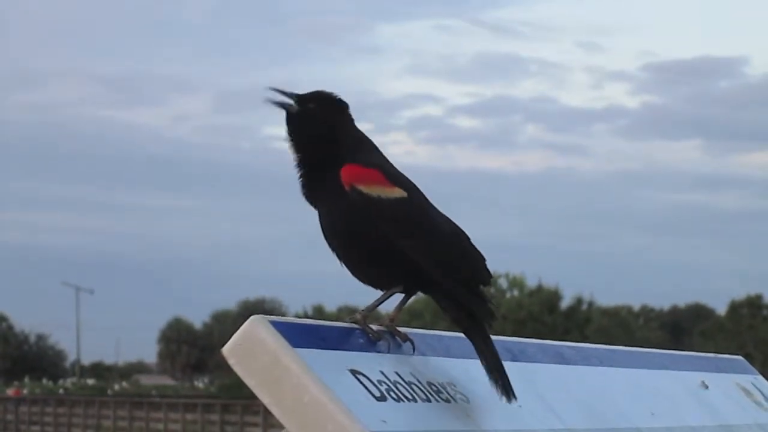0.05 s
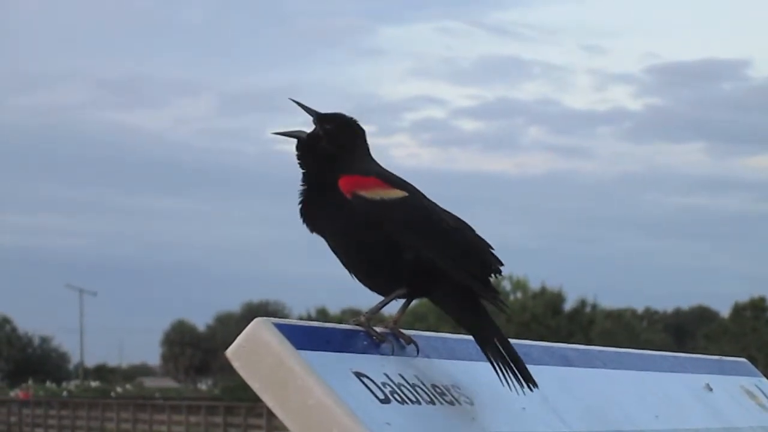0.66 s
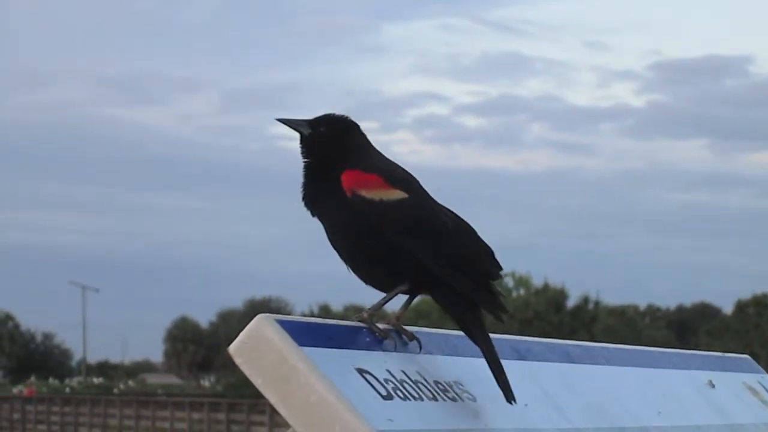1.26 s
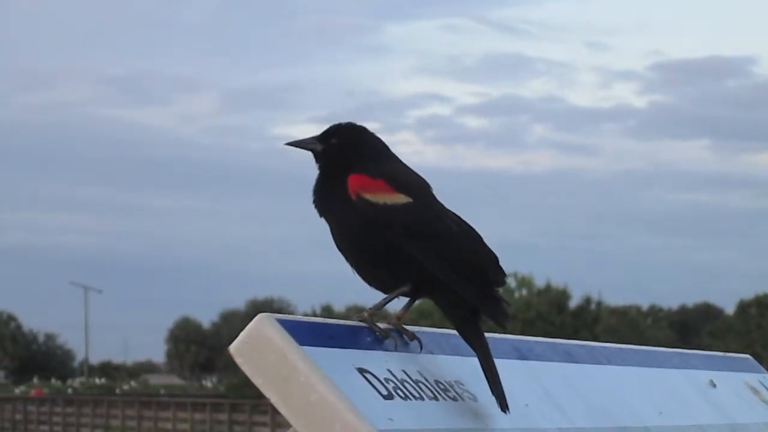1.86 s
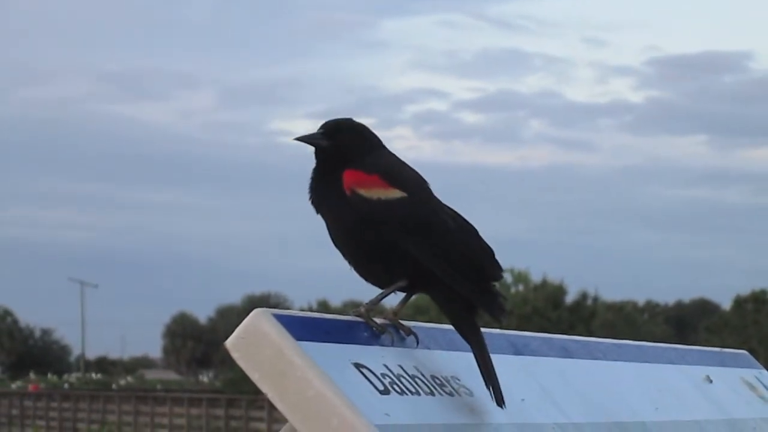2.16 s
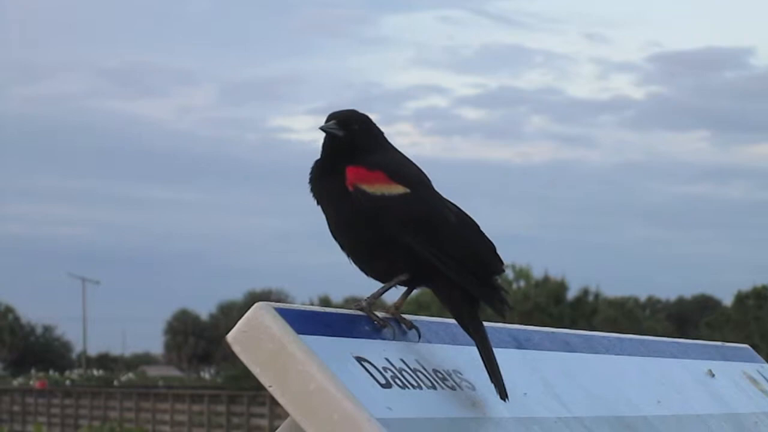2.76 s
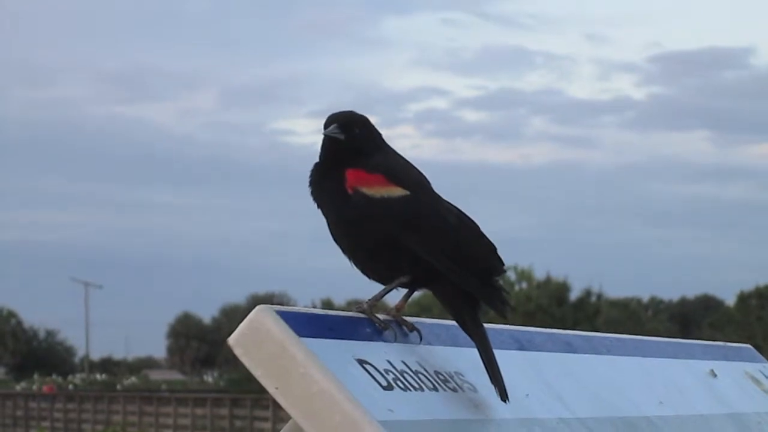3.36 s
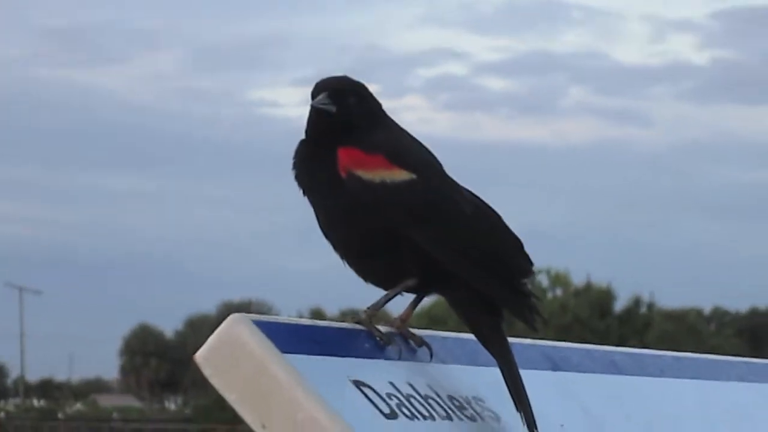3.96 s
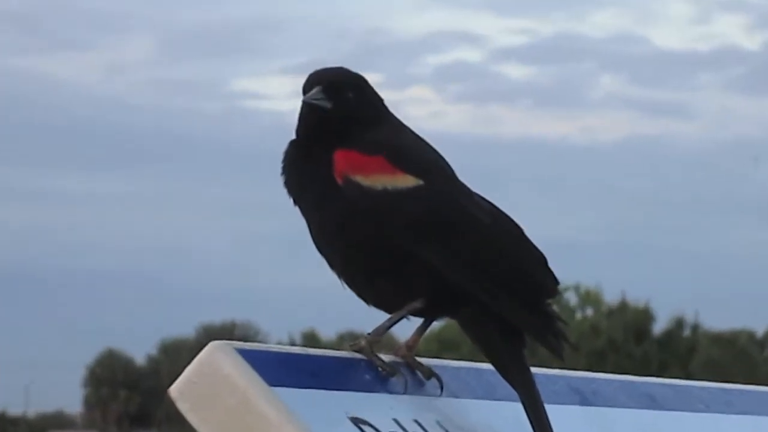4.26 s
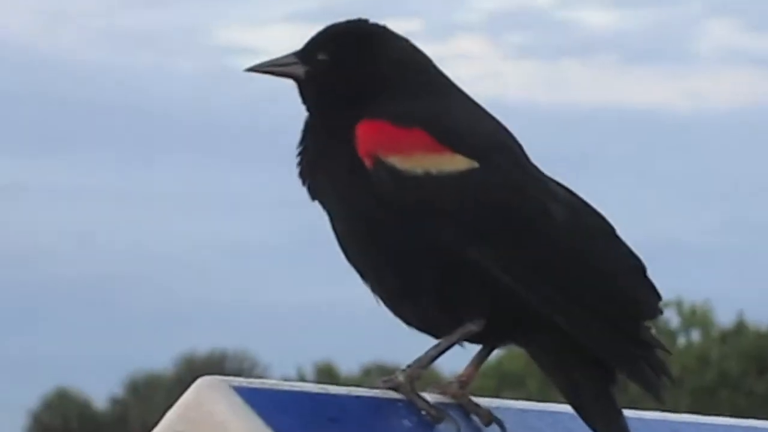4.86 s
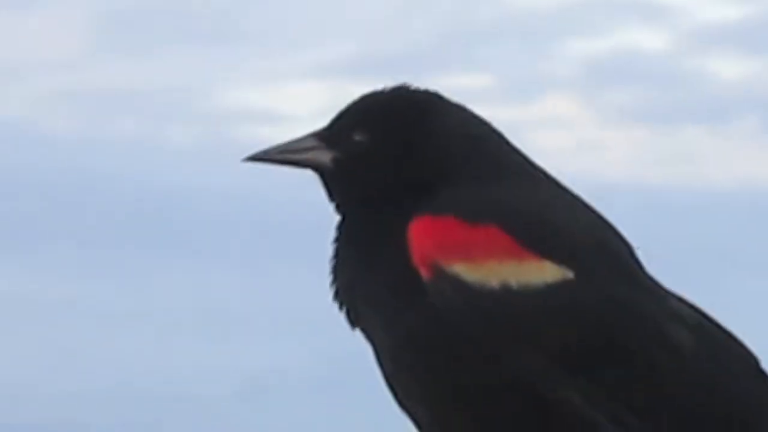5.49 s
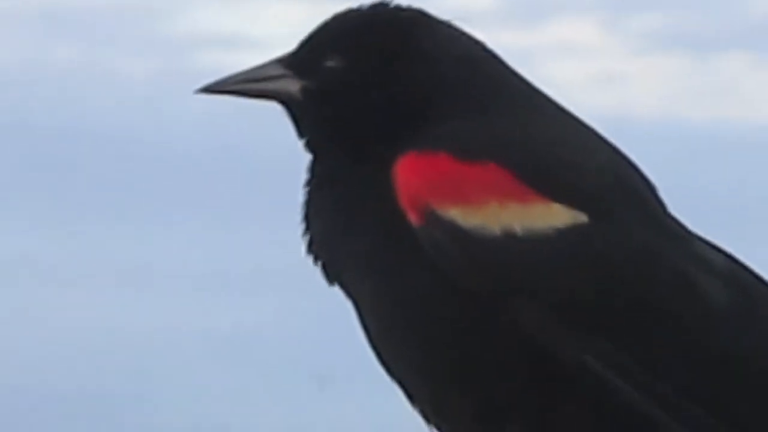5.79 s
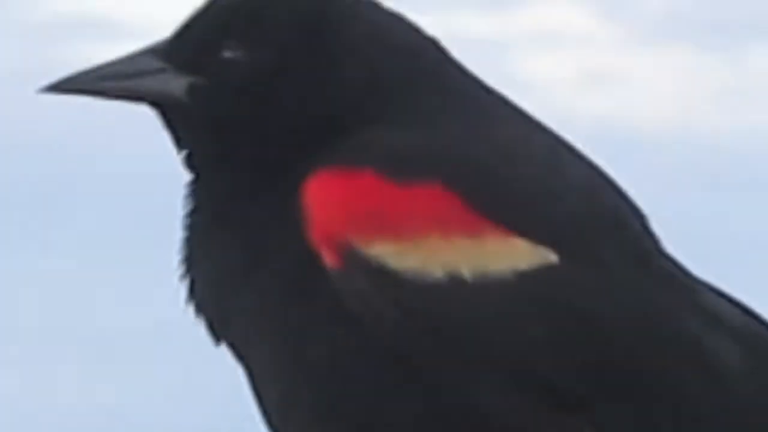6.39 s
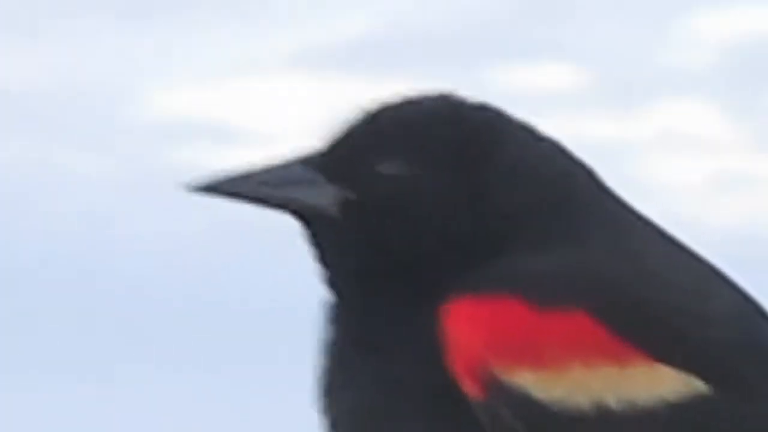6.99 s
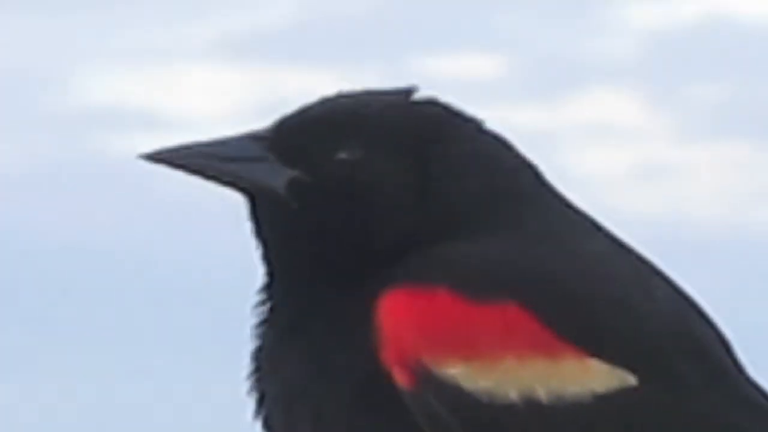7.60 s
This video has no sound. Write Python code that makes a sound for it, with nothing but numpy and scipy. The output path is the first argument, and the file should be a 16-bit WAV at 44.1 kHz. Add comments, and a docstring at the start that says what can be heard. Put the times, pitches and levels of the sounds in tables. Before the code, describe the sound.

A blackbird sings one loud buzzy trill close by, then distant birds give harsh calls over crickets and faint traffic, with one sharp snap.

```python
"""Blackbird in a marsh

A red-winged blackbird sings close by from both sides of its syrinx: gurgled notes, a buzzy trill,
a clear whistle. Farther off, tern-like birds give harsh falling calls over crickets and traffic rumble.
Something snaps twice against the camera; at the loud snap its gain control ducks, then creeps back."""
import sys
import numpy as np
from scipy import signal
from scipy.fft import rfft, irfft, next_fast_len
from scipy.io import wavfile
from scipy.ndimage import uniform_filter1d, map_coordinates

SR = 44100
rng = np.random.default_rng(int(sys.argv[2]) if len(sys.argv) > 2 else 0)


def log_audio(samples):
    """Write samples as a 16-bit WAV file to the path given in sys.argv[1]."""
    # one column per channel
    frames = np.atleast_2d(samples).T
    # limit to full scale, then quantise
    limited = np.clip(frames, -1, 1)
    pcm = np.round(limited * 32767).astype(np.int16)
    wavfile.write(sys.argv[1], SR, pcm)


N = 341334
TIME_S = np.arange(N) / SR

# Gurgled notes. Each row: start and length in seconds, share spent swelling, start and end pitch in Hz,
# level in dB, flutter depth, overtone boost in dB.
GURGLES = [ (0, 0.044, .3, 2664, 2310, -35, 0.25, 5.5), (0.036, 0.065, 0.078, 1167, 1208, -23, 0.15, 12),
           (0.098, 0.024, 0.45, 1344, 840, -31, 0.4, 0), (0.123, 0.015, .3, 1340, 1580, -20.5, 0.2, 0),
           (.128, 0.16, 0.099, 1540, 1633, -33.5, 0.5, 5), (0.151, .062, 0.43, 2987, 3180, -16.5, .55, 9),
           (0.209, 0.041, 0.12, 2077, 1930, -27.5, 0.42, 10.5), (0.224, .014, .65, 1596, 1355, -21, 0.4, 3),
           (0.238, 0.0062, .5, 1740, 1470, -16, .05, -7), (.243, .02, 0.27, 1166, 910, -33, 0.5, 0),
           (0.261, .04, 0.74, 6410, 6085, -17.5, 0.4, 18), (0.276, 0.1, 0.56, 2937, 3053, -9, 0.31, 3),
           (0.291, 0.083, 0.3, 2563, 2630, -16, 0.2, 0.5), (0.362, 0.019, 0.54, 6600, 3730, -9, 1.25, -1.5),
           (0.782, 0.025, .15, 3730, 2630, -23.5, 0.7, 5.5),
           (.805, 0.016, 0.38, 2380, 2800, -23.5, 0.86, 1), ]
# Blackbird's whistled tone. Each row: harmonic number, level in dB.
SONG_HARMONICS = [(1, -3), (2, -41), (3, -37), (4, -41), (5, -48), (6, -48), (7, -55)]
# Pulses of one trill syllable. Each row: start and length in syllables, share spent swelling,
# start and end pitch in Hz, relative level in dB, octave overtone in dB.
SYLLABLE_PULSES = [(.03, .92, 0.26, 3880, 4580, 3, -31.5), (-0.015, .58, 0.26, 3370, 3520, 2, -14),
                   (0.59, .5, 0.45, 3450, 3410, -2.5, -9)]
# Spectra of the song. Each row: frequency in Hz, gain in dB.
BEAK_HISS_SPECTRUM = [(1500, -17), (3000, 2), (5000, -11.5), (6700, -2.5), (8200, -15), (9500, -7.5),
                      (10700, -17.5), (12300, -18), (15500, -36)]
MEMBRANE_CLASH_SPECTRUM = [(1500, -60.5), (3000, -34.5), (5000, -23.5), (6500, -10.5), (8500, -10.5),
                           (10500, -14.5), (12200, -7.5), (14000, -14.5), (15500, -30.5)]
TRILL_RASP_SPECTRUM = [(1200, -28.5), (2100, -18.5), (2700, -16), (3300, -21), (3700, -20.5), (4500, -27),
                       (4900, -8.5), (5300, -7), (5900, -14), (6650, -7.5), (8000, -18.5), (9500, -24),
                       (11000, -19.5), (12500, -28), (15500, -56.5)]
# Tern-like calls. Each row: accent time and length after it in seconds, relative level in dB,
# pitch factor, throat resonance in Hz, harshness from 0 to 1.
TERN_CALLS = [ (1.233, 0.092, -55, 0.72, 2170, .5), (1.638, .1, -41.5, 0.92, 2350, 0.84),
              (2.405, .13, -35.5, 1.03, 2620, .93), (2.537, 0.12, -43.5, 1.05, 3610, 0.23),
              (2.648, 0.11, -40, 1, 2290, 0.74), (2.858, 0.13, -43, 1.03, 3330, 0.18),
              (3.045, 0.12, -53, 1.07, 2770, 0.6), (3.224, 0.11, -44, 1.06, 3160, 0.36),
              (3.478, .1, -40.5, 0.93, 2430, 1), (3.593, .14, -40.5, 1.07, 3030, 0.4),
              (3.776, 0.062, -49, 1.24, 3400, 0.92), (4.06, .075, -50, 1.26, 3100, .7),
              (4.244, 0.15, -39.5, 1.08, 3100, 0.5), (4.478, 0.068, -45.5, 1.3, 3100, .7),
              (4.845, 0.12, -31, 0.91, 2670, 0.88), (5.473, 0.088, -45, 1.27, 2920, 0.78),
              (5.698, 0.13, -40.5, 1.04, 2960, 0.43), (5.779, 0.13, -41, .87, 2470, .87),
              (6.005, 0.11, -29.5, 0.99, 2620, 0.99), (6.277, 0.14, -41.5, 1.02, 3200, 0.33),
              (6.443, 0.094, -47.5, 0.94, 3135, 0.4), (6.733, 0.12, -30, 1.04, 2590, 0.99),
              (6.93, 0.095, -44, 0.92, 2350, 0.93), (7.105, 0.13, -29.5, 1.04, 2680, 1),
              (7.317, 0.12, -43, 1.14, 3350, 0.57), (7.441, 0.12, -30, 1.07, 2730, 1), ]
# Timbre of those calls. Each row: frequency in Hz, gain in dB.
TERN_SPECTRUM = [(700, -38), (1400, -3), (2100, 0), (3600, 3), (4100, -2.5), (5100, -9), (6800, -1),
                 (8300, -0.5), (9300, -7.5), (10700, -11), (12500, -19.5), (15500, -51)]
# Contacts with the case. Each row: start in seconds, gain in dB.
CASE_HITS = [(3.575, -25.5), (6.3712, 11)]
# Ringing modes of the case. Each row: frequency in Hz, level in dB, T60 in seconds.
CASE_MODES = [(716, -36, 0.0048), (1550, -37.5, .07), (2140, -42.5, 0.34), (2806, 4, 0.0023),
              (4360, 7.5, 0.0024), (3500, -41, .1), (4360, -37.5, 0.29), (6100, -26.5, 0.092),
              (6380, -25, 0.13), (9570, -15, 0.016), (9900, 3, 0.0044), (12300, -35, .03)]
# Distant birds. Each row: start and length in seconds, start and end pitch in Hz, level in dB.
FAR_WHISTLES = [(0.993, 0.1, 3070, 2780, -55), (1.228, .14, 3040, 2800, -60),
                (1.489, 0.14, 3000, 2950, -56.5), (1.792, 0.078, 3030, 2630, -59),
                (1.848, 0.096, 3450, 3490, -59.5), (1.885, 0.13, 1605, 1610, -58.5),
                (2.01, 0.077, 3050, 2780, -55.5), (2.625, 0.21, 2257, 2216, -50),
                (6.175, 0.044, 4480, 4860, -55), (7.186, .04, 5070, 5404, -51), (7.21, .1, 3550, 3570, -53),
                (7.66, .09, 3890, 4610, -61)]
# Spectra of the background. Each row: frequency in Hz, gain in dB.
CRICKET_SPECTRUM = [(4400, -47.5), (4900, -21), (5250, -12.5), (5650, 2.5), (5900, 1), (6130, 0.5),
                    (6300, -40.5), (6800, -63.5)]
RUMBLE_SPECTRUM = [(20, -10.5), (40, -9.5), (65, 1), (110, -5.5), (170, -10), (350, -13.5), (700, -15),
                   (1200, -19.5), (1800, -25), (2800, -23), (4500, -30.5), (7500, -36.5), (11000, -42.5),
                   (15700, -51)]

LEAD_S = .036  # rising note ahead of a harsh call's accent


def gurgles(flutter_hz=245, jitter=0.022, hiss_db=-25):
    """Both sides of the syrinx whistle short glides; overlaps beat, flutter roughens them."""
    out = np.zeros(N)
    for start_s, length_s, peak, start_hz, end_hz, db, flutter, bright_db in GURGLES:
        size = int(length_s * SR)
        swell = np.abs(arch(np.linspace(0, 1, size), peak)) ** 1.06 * amp(db)
        beat = np.cos(phase_of(flutter_hz * (1 + 0.18 * wobble(49, size))))
        bend = 1 + flutter * (0.0091 * beat + jitter * wobble(2100, size))
        voice = swell * tone(np.linspace(start_hz, end_hz, size) * bend, SONG_HARMONICS, bright_db)
        # beak hiss grows more slowly than the tone
        hiss = amp(hiss_db) * np.sqrt(swell * (flutter + 0.017)) * noise(BEAK_HISS_SPECTRUM, size)
        pressure = 1 + flutter * (.8 * beat + .15 * wobble(1300, size))
        add(out, start_s, (voice + hiss) * pressure)
    return out + colour(np.abs(out), MEMBRANE_CLASH_SPECTRUM)  # membranes clash: rough sum tones


def trill(start_s=.372, end_s=0.7966, syllable_hz=103.9, first_syllable_s=.3579, fade_db_per_s=10.5):
    """Each syllable: an upsweep from one side of the syrinx over two low pulses from the other."""
    t = np.arange(start_s, end_s, 1 / SR)
    age_s, size = t - start_s, len(t)
    cycle = (t - first_syllable_s) * syllable_hz + 0.014 * wobble(110, size)
    sag = 1 - 0.032 * age_s + 0.024 * np.exp(-age_s / 0.062)  # starts sharp, settles, sinks
    voice, effort = 0, 0
    for onset, length, peak, start_hz, end_hz, db, octave_db in SYLLABLE_PULSES:
        progress = np.minimum((cycle - onset) % 1 / length, 1)
        jitter = 1 + .014 * wobble(900, size) + .006 * wobble(100, size)
        hz = (start_hz + (end_hz - start_hz) * progress) * sag * jitter
        strength = amp(db + 0.67 * wobble(700, size)) * np.abs(arch(progress, peak)) ** 0.94
        voice += strength * tone(hz, [(1, 0.0022), (2, octave_db), (3, -39)])
        effort += strength
    rasp = amp(-13) * unit(np.sqrt(effort) * noise(TRILL_RASP_SPECTRUM, size))
    undertone = amp(-28) * tone(2070 * (1 + 0.0037 * wobble(200, size)), [(1, 0)])
    envelope = amp(-11 - fade_db_per_s * age_s) * gate(t, start_s, end_s, attack_s=.03, release_s=0.019)
    out = np.zeros(N)
    add(out, start_s, envelope * (unit(voice) + rasp + undertone))
    return out


def closing_whistle(start_s=0.8156, end_s=0.98, pitch_hz=2126, hold_s=0.093, fade_db_per_s=115):
    """One pure note ends the song: it scoops up, holds, fades."""
    t = np.arange(start_s, end_s, 1 / SR)
    age_s = t - start_s
    scoop = 0.019 * np.exp(-age_s / 0.042)
    hz = pitch_hz * (1 - scoop + .001 * wobble(330, len(t)))
    db = -7.5 - fade_db_per_s * np.maximum(age_s - hold_s, 0)
    voice = tone(hz, SONG_HARMONICS, bright_db=-2) + amp(-46) * noise(BEAK_HISS_SPECTRUM, len(t))
    out = np.zeros(N)
    add(out, start_s, voice * amp(db) * gate(t, start_s, end_s, attack_s=0.032, release_s=0.01))
    return out


def terns(near_gain_db=-3, colony_db=-59, colony_calls=38):
    """Nearer callers, and faint random calls from the colony behind."""
    out = np.zeros(N)
    for accent_s, length_s, db, pitch, throat_hz, harsh in TERN_CALLS:
        call = tern_call(length_s, pitch, throat_hz, harsh)
        add(out, accent_s - LEAD_S, amp(db + near_gain_db) * call)
    for slot, (offset, distance, pitch, harsh) in enumerate(rng.random((colony_calls, 4))):
        call = tern_call(.12, .9 + .3 * pitch, 2600 + 800 * pitch, .4 * harsh)
        add(out, (slot + offset) / colony_calls * N / SR, amp(colony_db - 4.1 * distance) * call)
    return out


def tern_call(length_s, pitch, throat_hz, harsh, throat_width_hz=520):
    """Falling harmonics slide through the throat resonance; harsh calls break up after the accent."""
    t = np.arange(-LEAD_S, .16, 1 / SR)
    size = len(t)
    contour_hz, swell = call_contour(t, length_s, harsh)
    jitter = (.004 + .005 * harsh) * wobble(2500, size)  # blurs mainly the high harmonics
    waver = .012 * (1 + harsh) * wobble(90, size)
    hz = contour_hz * pitch * (1 + jitter + waver)
    phase = phase_of(hz)
    stack = sum(np.sin(k * phase) * (k * hz < SR / 2) for k in range(1, 26))
    # the third harmonic carries lead note and accent
    third_boost = (amp(8) - 1) * harsh ** 2 * np.interp(t, [.025, .06], [1, 0])
    stack = unit(stack + third_boost * np.sin(3 * phase))
    breakup = harsh ** 2 * np.interp(t, [-.01, .008, .025, .05], [.15, .02, .05, .45])
    hiss = unit(rng.standard_normal(size) * (1 + np.cos(phase)))
    envelope = swell * amp(2.2 * harsh * wobble(260, size))
    voice = rfft(envelope * (np.sqrt(1 - breakup) * stack + np.sqrt(breakup) * hiss))
    rasp = rfft(envelope * rng.standard_normal(size)) * amp(8.1 * (0.5 + harsh))
    bin_hz = np.fft.rfftfreq(size, 1 / SR)
    voiced = .7 + .3 / (1 + (bin_hz / 4900) ** 8)  # rasp veils the top harmonics
    source = np.sqrt(voiced) * voice + np.sqrt(1 - voiced) * rasp
    throat = 1 + amp(16) / (1 + ((bin_hz - throat_hz) / throat_width_hz) ** 2) ** 0.76
    treble_cut = amp((1 - harsh) * np.interp(bin_hz, [4000, 6000], [0, -5]))
    return unit(colour(irfft(source * throat * treble_cut, size), TERN_SPECTRUM))


def call_contour(t, length_s, harsh, accent_s=.016, accent_db=4, fade_db=4.5, attack_s=0.021):
    """Pitch and loudness: a rising lead note if harsh, a high accent at t = 0, a long fall."""
    after_s, before = np.maximum(t, 0), np.minimum(t, 0) / LEAD_S
    accent = np.exp(-after_s / accent_s)
    base_hz = np.interp(harsh, [0, 1], [1048, 844])
    fall_octaves = np.interp(harsh, [0, 1], [.7, .85])
    hz = base_hz * 2 ** (-fall_octaves * after_s / length_s) * (1 + .27 * accent) * (1 + .5 * before)
    body = amp(accent_db * np.sqrt(accent) - fade_db * after_s / length_s)
    body *= gate(t, -attack_s / 2, length_s, attack_s, release_s=0.047)
    lead = harsh ** 2 * amp(-1) * arch(1 + before, 0.55) ** 2
    return hz, body + lead


def snaps(crack_t60_s=0.0065, tail_t60_s=0.16, attack_s=0.00024):
    """Hard, short contacts: a crack, and small parts of the case ringing."""
    out, t = np.zeros(N), np.arange(SR // 3) / SR
    for start_s, gain_db in CASE_HITS:
        ring = sum(amp(db - 60 * t / t60_s) * np.sin(2 * np.pi * hz * t) for hz, db, t60_s in CASE_MODES)
        grit = noise([(9000, 2), (14000, 0), (15700, -20)], len(t))
        crack = (amp(-16 - 60 * t / crack_t60_s) + amp(-33 - 60 * t / tail_t60_s)) * grit
        add(out, start_s, amp(gain_db) * (ring + crack) * (1 - np.exp(-t / attack_s)))
    return out


def far_whistles():
    """Thin, wavering glides of distant birds."""
    out = np.zeros(N)
    for start_s, length_s, start_hz, end_hz, db in FAR_WHISTLES:
        size = int(length_s * SR)
        hz = np.linspace(start_hz, end_hz, size) * (1 + 0.0026 * wobble(200, size))
        add(out, start_s, amp(db) * unit(np.sin(phase_of(hz)) * signal.windows.tukey(size, .6)))
    return out


def crickets(chorus_db=-52, near_db=-57, wing_hz=6050, stroke_hz=78, period_s=.2868, quicken_s=.0007):
    """A trilling chorus; the nearest chirps ever faster, each wing stroke sagging in pitch."""
    fast_trill = 0.15 * np.sin(phase_of(155 + 3 * wobble(8.8)))
    slow_trill = 0.17 * np.sin(phase_of(75 + 4 * wobble(8.6)))
    out = amp(chorus_db + wobble(11)) * unit(noise(CRICKET_SPECTRUM) * (1 + fast_trill + slow_trill))
    t = np.arange(0, .141, 1 / SR)  # one chirp
    cycle = t * stroke_hz % 1
    strokes = np.sin(np.pi * np.clip(cycle / .7, 0, 1)) ** 2
    for k in range(28):
        start_s = .063 + k * (period_s - quicken_s * k / 2) + rng.normal(0, .004)
        hz = wing_hz * (1 + .045 * (.4 - cycle) + .004 * wobble(500, len(t)))
        add(out, start_s, amp(near_db + rng.normal(0, .5)) * strokes * tone(hz, [(1, 0.022), (2, -7)]))
    return out


def rumble(level_db=-44, fade_db=2.5, drone_db=-54, drone_hz=60):
    """Far traffic and open air, receding, over a wavering low drone."""
    db = level_db - fade_db * (TIME_S / TIME_S[-1]) ** 2
    drone = tone(drone_hz * (1 + .04 * wobble(7)), [(1, 0), (2, -4)]) * amp(drone_db + 1.6 * wobble(6))
    return amp(db + 0.27 * wobble(1.1)) * noise(RUMBLE_SPECTRUM) + drone


def scatter(x, wet_db, t60_s):
    """Add weak, dull reflections from trees, water and boardwalk."""
    t = np.arange(SR) / SR
    tail = noise([(1000, -2.5), (3500, -5), (8000, -4), (15000, -46)], SR)
    tail *= amp(-60 * t / t60_s) * (1 - np.exp(-t / 0.002))
    return x + amp(wet_db) * signal.fftconvolve(x, tail / np.linalg.norm(tail))[:N]


def amp(db):
    """Decibels to gain."""
    return 10 ** (np.asarray(db) / 20)


def unit(x):
    """Scale to rms 1."""
    return x / np.sqrt(np.mean(x ** 2) + 1e-20)


def wobble(rate_hz, size=N):
    """Smooth random curve, rate_hz knots a second."""
    knots = rng.standard_normal(size // 8 + 8)
    return map_coordinates(knots, [np.arange(size) * rate_hz / SR + 2], mode="wrap")


def colour(x, spectrum):
    """Filter by (Hz, dB) points on a log axis."""
    size = next_fast_len(len(x) + 8192)
    hz, db = np.transpose(spectrum)
    gain = amp(np.interp(np.log(np.fft.rfftfreq(size, 1 / SR) + 1), np.log(hz), db))
    return irfft(rfft(x, size) * gain, size)[:len(x)]


def noise(spectrum, size=N):
    """Coloured noise of rms 1."""
    return unit(colour(rng.standard_normal(size), spectrum))


def phase_of(hz):
    """Running phase in radians."""
    return 2 * np.pi * np.cumsum(hz) / SR


def tone(hz, harmonics, bright_db=0):
    """Sum of (harmonic number, dB) sines; bright_db lifts the overtones."""
    phase = phase_of(hz)
    return np.sqrt(2) * sum(amp(db + bright_db * (k > 1)) * np.sin(k * phase) * (k * hz < SR / 2)
                            for k, db in harmonics)


def arch(progress, peak):
    """Swell from progress 0 to the peak, die away by 1."""
    return np.sin(np.pi * np.interp(progress, [0, peak, 1], [0, .5, 1]))


def gate(t, start_s, end_s, attack_s, release_s):
    """Linear attack, hold, release."""
    return np.clip((t - start_s) / attack_s, 0, 1) * np.clip((end_s - t) / release_s, 0, 1)


def add(track, start_s, x):
    """Mix x into the track."""
    start = round(start_s * SR)
    x = x[max(-start, 0):max(N - start, 0)]
    track[max(start, 0):][:len(x)] += x


def scene():
    """Near blackbird, far birds, background and snaps, in mono."""
    blackbird = scatter(gurgles() + trill() + closing_whistle(), wet_db=-17, t60_s=.1)
    blackbird = scatter(blackbird, wet_db=-34, t60_s=.45)
    far_birds = scatter(terns() + far_whistles(), wet_db=-8, t60_s=0.29)
    return (blackbird + far_birds + crickets() + rumble() + snaps())[None]


def record(dry, threshold_db=-15, attack_s=0.012, release_db_per_s=15, ceiling=.68, cutoff_hz=15800):
    """Gain control ducks on peaks and creeps back; then soft clip and band limit."""
    x = dry[0]
    power = np.abs(uniform_filter1d(x ** 2, size=44))  # 1 ms window
    over_db = np.maximum(10 * np.log10(power + 1e-12) - threshold_db, 0)
    release_db = release_db_per_s * TIME_S
    held_db = np.maximum.accumulate(over_db + release_db) - release_db
    pole = np.exp(-1 / (attack_s * SR))
    ducked = x * amp(-signal.lfilter([1 - pole], [1, -pole], held_db))
    clipped = ducked / (1 + (ducked / ceiling) ** 4) ** (1 / 4)
    size = next_fast_len(N + 8192)
    passband = np.fft.rfftfreq(size, 1 / SR) < cutoff_hz
    return irfft(rfft(clipped, size) * passband, size)[None, :N]


dry = scene()
out = record(dry)
log_audio(out)
```